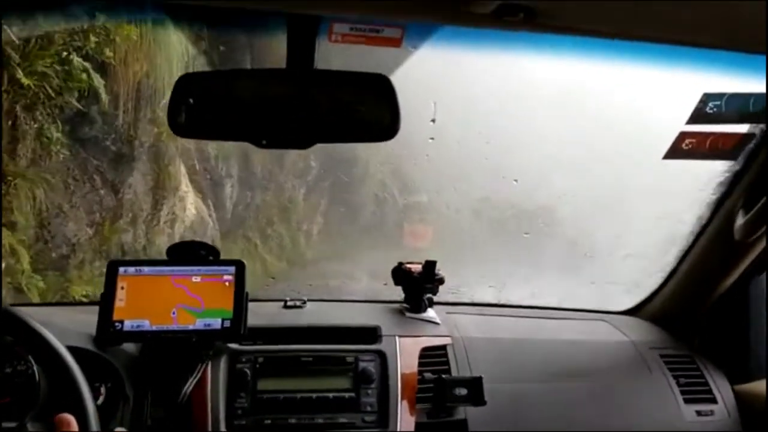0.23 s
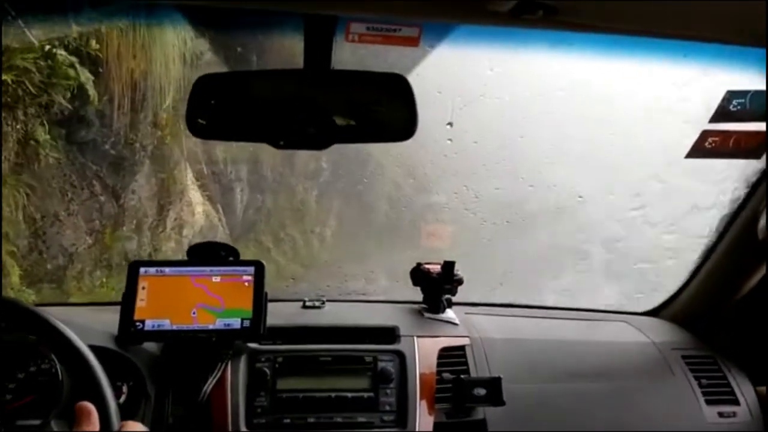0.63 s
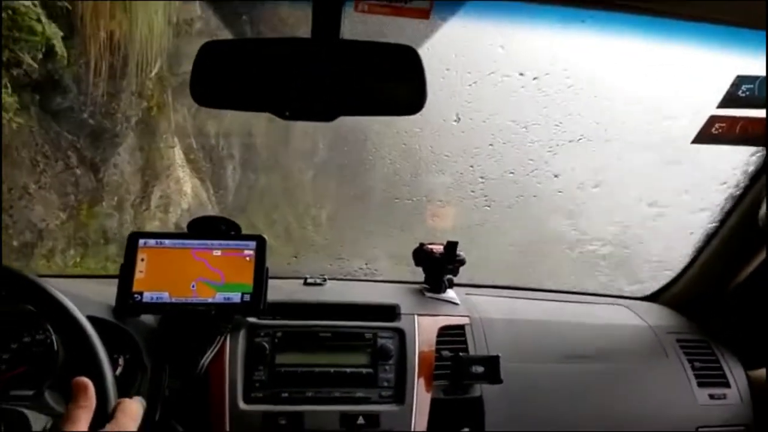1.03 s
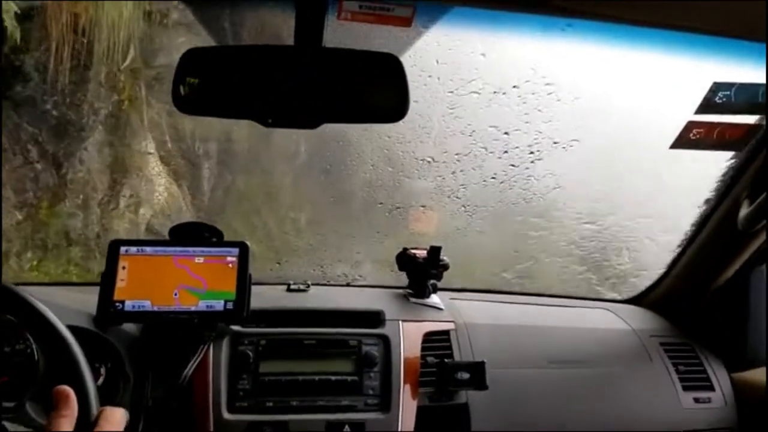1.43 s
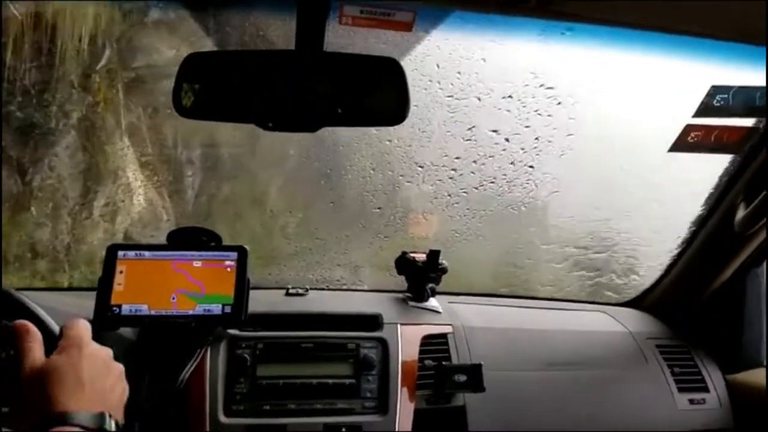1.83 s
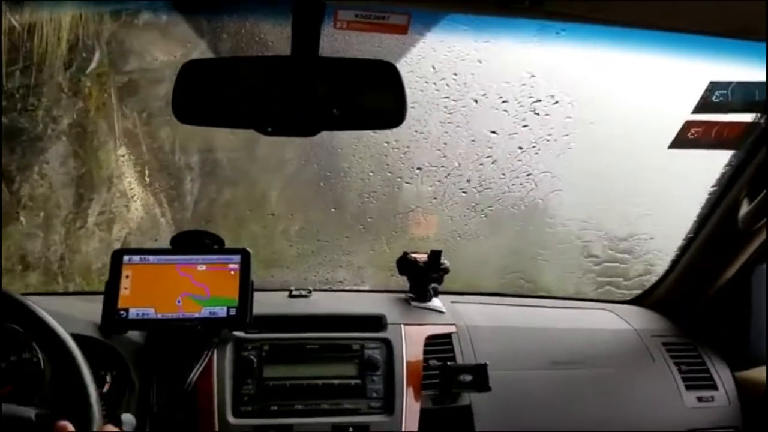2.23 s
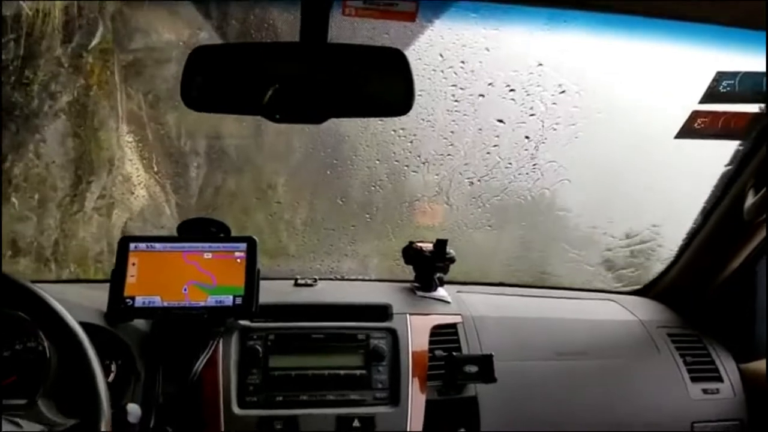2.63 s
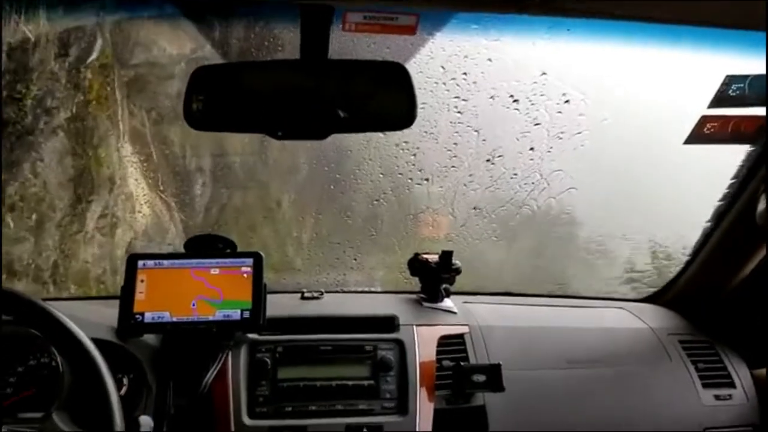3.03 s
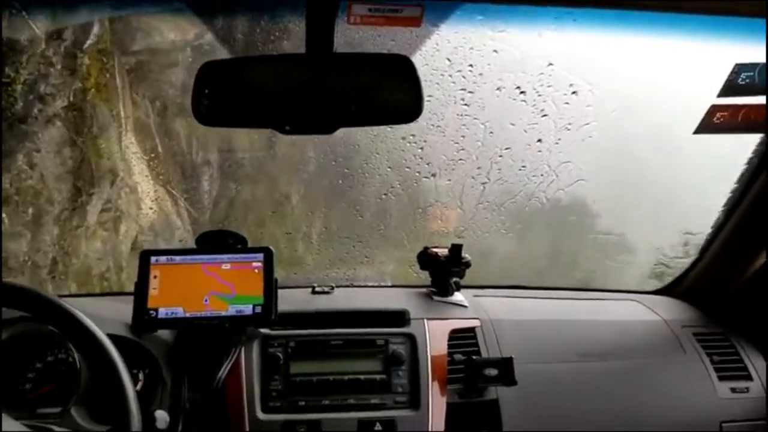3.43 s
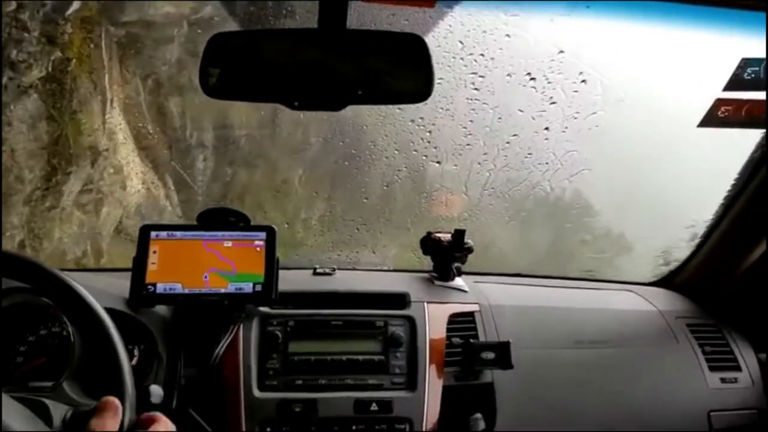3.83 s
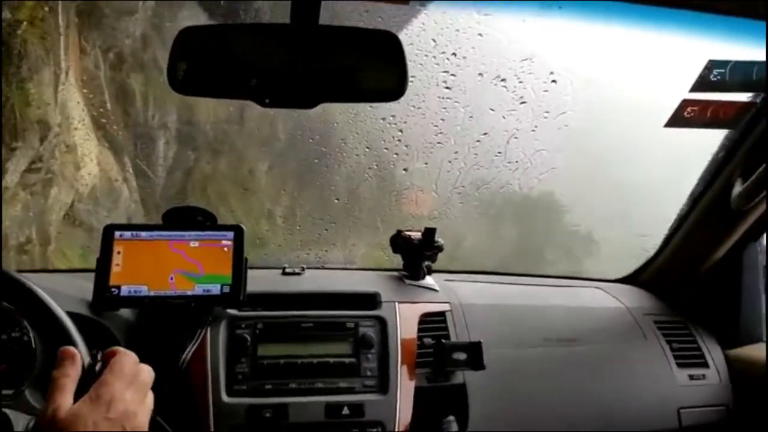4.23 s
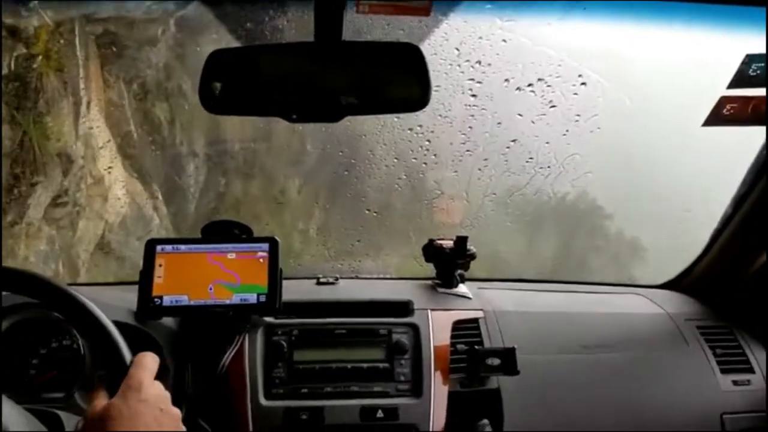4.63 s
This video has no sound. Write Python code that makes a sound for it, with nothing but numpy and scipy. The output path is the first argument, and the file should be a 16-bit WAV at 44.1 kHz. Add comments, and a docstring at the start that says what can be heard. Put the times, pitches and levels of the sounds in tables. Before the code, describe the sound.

A dense, loud torrent hits a car from outside: bright crackling drops on glass first, over a boomy cabin, then hollow drumming on lined sheet steel with heavy knocks and short sags. The rear roof rings higher before the water runs out. Quiet engine and road rumble remains, with dry ticks and a very faint high squeak, recorded inside.

```python
"""A roadside waterfall lands on a slowly rolling car, heard from inside the cabin.
The stream splatters on the windshield, then drums back along the roof in gouts and brief sags, and runs out:
random and listed impacts excite panels, modelled as coloured, decaying noise responses.
The covered pane makes the cabin air boom, spray hisses behind and dribbles end it as filtered drop trains.
Engine and road rumble as filtered noise; decaying sines and cracks click; two gliding sines squeak faintly."""
import sys
import numpy as np
from scipy import signal
from scipy.fft import rfft, irfft
from scipy.io import wavfile
from scipy.ndimage import uniform_filter1d

SR = 44100
rng = np.random.default_rng(int(sys.argv[2]) if len(sys.argv) > 2 else 0)


def wav_record(signal):
    """Record a signal, one row per channel, as 16-bit PCM in the file named by sys.argv[1]."""
    frames = np.transpose(np.atleast_2d(signal))
    bounded = np.clip(frames, -1, 1)
    # unit amplitude maps onto the largest positive 16-bit level
    quanta = np.round(bounded * 32767).astype(np.int16)
    wavfile.write(sys.argv[1], SR, quanta)


N = 215368
TIME = np.arange(N) / SR
SIZE = 4096  # samples in a panel response
LEAD = 128  # samples of room for the front of a response
HZ = np.fft.rfftfreq(SIZE, 1 / SR)
SPOTS = 6  # places on a panel that answer differently
FRONT, DOME, MIDDLE, CABIN, REAR = range(5)  # parts of the roof, as rows of the passage table

# Levels in all tables are relative; left_right_db is left minus right.
# water landing on the windshield: start_s [s], flow_db [dB]
GLASS_STREAM = [(0, -3), (0.15, -1.5), (0.4, 1), (0.8, -4), (1.2, -8.5), (1.38, -20), (1.9, -24),
                (3.4, -40), (4.1, -51)]
# water landing on the roof: start_s [s], flow_db [dB]
ROOF_STREAM = [(0, 0), (1.1, 2), (1.5, 1), (1.8, 1.5), (2.55, 1), (2.95, -1.5), (3.39, -5), (3.44, -10),
               (3.65, -14), (3.75, -29), (3.92, -18), (4.15, -28)]


def amp(db):
    """Logarithmic level: decibels to amplitude gain."""
    return np.exp(np.asarray(db) * (np.log(10) / 20))


def evened(x):
    """Normalisation by mean power: scales to an rms of one."""
    return x / np.sqrt(np.mean(x ** 2) + 1e-20)


def level(curve):
    """Amplitude envelope: a dB curve, linear between its points, as a gain for every sample."""
    return amp(np.interp(TIME, *np.transpose(curve)))


def read(points, axis=1):
    """Logarithmic frequency scale: interpolates one column of a spectrum at every frequency."""
    rows = np.array(points)
    return np.interp(np.log(HZ + 1), np.log(rows[:, 0] + 1), rows[:, axis])


def colour(points):
    """Minimum phase: causal left and right filters that together keep the power of white noise."""
    lean = amp(read(points, axis=2))
    sides = np.array([lean, np.ones_like(lean)]) / np.hypot(lean, 1)
    gain = evened(amp(read(points)) * sides)
    # folding the cepstrum onto positive time makes the filter causal
    cepstrum = irfft(np.log(gain + 1e-6), SIZE)
    cepstrum[:, 1:SIZE // 2] *= 2
    cepstrum[:, SIZE // 2 + 1:] = 0
    return np.exp(rfft(cepstrum))


def heard(pair, points):
    """Interaural coherence: mixes two spectra into a stereo response, most alike at long wavelengths."""
    # likeness of the two sides: frequency_hz [Hz], correlation [-1 to 1]
    likeness = [(60, .992), (130, .975), (290, .88), (640, .7), (1000, .1), (1350, -.3), (2400, -.05),
                (6000, 0)]
    same = np.array([np.ones_like(HZ), np.clip(read(likeness), -1, 1)])
    mixed = same * pair[..., :1, :] + np.sqrt(1 - same ** 2) * pair[..., 1:, :]
    return np.roll(irfft(mixed * colour(points), SIZE), LEAD, axis=-1)


def sounded(impacts, answers):
    """Linear superposition: convolves each impact train with its stereo response, block by block."""
    count = N // SIZE + 1
    padded = np.pad(impacts, ((0, 0), (0, count * SIZE - N)))
    blocks = padded.reshape(len(impacts), count, SIZE)
    block_spectra = rfft(blocks.astype(np.float32), 2 * SIZE)
    answer_spectra = rfft(answers.astype(np.float32), 2 * SIZE)
    summed = np.einsum("sbf,scf->cbf", block_spectra, answer_spectra)
    heads, tails = np.split(irfft(summed), 2, axis=2)
    heads[:, 1:] += tails[:, :-1]
    return heads.reshape(2, -1)[:, LEAD:LEAD + N]


def drops(per_s, spread_db, clump_db, clump_hz):
    """Clustered random impacts: drops of uneven size, where each clump lands on one spot of a panel."""
    starts = rng.random(N) < 4 * clump_hz / SR
    # every clump start decays exponentially; the slow mean is taken out
    clumps = signal.lfilter([1.], [1., -np.exp(-2 * np.pi * abs(clump_hz) / SR)], 1. * starts)
    clumps = evened(clumps - uniform_filter1d(clumps, size=3600))
    chance, weight = rng.random(N), rng.exponential(1, N)
    sign, spot = rng.choice([-1., 1.], N), rng.integers(0, SPOTS, N)
    at = np.flatnonzero(chance < per_s / SR)
    clump_start = np.maximum.accumulate(np.arange(N) * starts)[at]
    size_db = spread_db * np.minimum(weight[at], 3) + clump_db * np.minimum(clumps[at], 2)
    sizes = sign[at] * amp(size_db)
    hits = np.zeros((SPOTS, N), np.float32)
    hits[spot[clump_start], at] = sizes * np.sqrt(N / np.sum(sizes ** 2))
    return hits


def knocks(times, dbs):
    """Impulsive excitation: single impacts that land on one spot of the panel after another."""
    hits = np.zeros((SPOTS, N), np.float32)
    hits[np.arange(len(times)) % SPOTS, np.round(np.array(times) * SR).astype(int)] = amp(dbs)
    return hits


def gouts(times, dbs, lengths):
    """Transient force: lumps of water that burst with a fast rise and spread out with an exponential fall."""
    force = np.zeros(N)
    for s, db, length in np.broadcast(times, dbs, lengths):
        start = max(round(s * SR), 0)
        age = TIME[:N - start][:SR // 4] / length
        force[start:start + len(age)] += amp(db) * (1 - np.exp(-20 * age)) * np.exp(-age)
    return force


def flow(curve):
    """Modulated force: the stream on a panel, whose level dips at the listed breaks."""
    # breaks in the stream: center_s [s], depth_db [dB, negative for a slight swell]
    breaks = [(0.005, 2), (0.122, 0), (0.275, 4), (0.608, 7), (0.768, 2.5), (0.963, 2.5), (1.41, 3),
              (1.715, -0.5), (1.967, 5), (2.225, 3), (2.697, 9), (3.225, 5.5)]
    lull_s = 0.013  # Gaussian width
    depth_db = sum(db * np.exp(-((TIME - s) / lull_s) ** 2) for s, db in breaks)
    return level(curve) * amp(-depth_db)


def passing(part):
    """Moving excitation: gain of one part of the roof as the stream nears it and leaves it."""
    # front edge (patters), dome (booms), middle (drums), stretch that pumps the cabin air, rear (rings higher):
    # loudest_s [s], level_db [dB], rise [dB/s], fall [dB/s]
    passages = [(0.45, -33, 4.5, 1.5), (1.8, -30.5, 4, 6), (1.82, -27, 1.65, 2.5), (2.42, -35.5, 23.5, 48),
                (2.9, -33.5, 14, 7)]
    s, db, rise, fall = passages[part]
    return amp(db - rise * np.maximum(s - TIME, 0) - fall * np.maximum(TIME - s, 0))


def panel(impacts, points, ring_s, direct, even=1, patchy_db=0):
    """Impulse response: each spot gives a sharp knock, then decaying panel and cabin echoes in its own colour."""
    spot_width_hz = 384  # spacing of the random colour differences between spots
    spots = len(impacts)
    # ring_s is the time to fall by 60 dB
    answer = rng.standard_normal((spots, 2, SIZE)) * amp(-60 * TIME[:SIZE] / ring_s)
    answer /= np.linalg.norm(answer, axis=2, keepdims=True)
    knock = np.arange(SIZE) == rng.integers(0, 20, (spots, 2, 1))
    answer += direct * knock * rng.choice([-1, 1], (spots, 2, 1))
    modes = rfft(answer)
    power = (abs(modes) ** 2).mean(0)
    # with even = 0 the narrow resonances stand out
    modes /= np.sqrt(power ** even * power.mean() ** (1 - even))
    random_rows = rng.standard_normal((spots, len(HZ)))
    uneven = [np.interp(HZ / spot_width_hz, np.arange(len(row)), row) for row in random_rows]
    tints = amp(patchy_db * np.array(uneven))
    tints /= np.sqrt((tints ** 2).mean(0))
    return sounded(impacts, heard(modes * tints[:, None], points))


def squeak(lower_ratio=0.775, lower_db=-3):
    """Frequency modulation: two thin partials rise quickly and sink more slowly, loudest at the top."""
    peak_s, rise_s, fall_s = 4.667, 0.04, 0.064
    top_hz, sag, squeak_db = 14900, 0.18, -77  # sag is the share of pitch lost away from the peak
    arch = np.exp(-((TIME - peak_s) / np.where(TIME < peak_s, rise_s, fall_s)) ** 2 / 2)
    waver = evened(uniform_filter1d(rng.standard_normal(N), size=60))
    pitch_hz = top_hz * (1 - sag * (1 - arch)) * (1 + .005 * waver)
    phase = 2 * np.pi * np.cumsum(pitch_hz) / SR
    partials = np.sin(phase) + amp(lower_db) * np.sin(lower_ratio * phase)
    return amp(squeak_db) * np.sqrt(arch) * partials


def road():
    """Broadband structure-borne noise: engine and tyres rumble through the body."""
    # rumble level: start_s [s], level_db [dB]
    rumble_curve = [(0, -50), (3.8, -55), (4.25, -47), (4.65, -40), (4.88, -44.5)]
    # rumble spectrum: frequency_hz [Hz], density_db [dB per Hz], left_right_db [dB]
    rumble_colour = [(10, -32, -2), (26.2, 2, 0), (56.6, -6, 3), (100, -1.5, 0.5), (133, -2, 2.5),
                     (176, -11, 1.5), (221, -5, 0), (348, -16, 0), (700, -23.5, 1.5), (1070, -31.5, 10),
                     (1800, -41.5, -2), (3200, -34.5, -12), (4800, -41, -9), (7000, -44, 18),
                     (9200, -65, -1), (15000, -49, 12)]
    noise = rng.standard_normal((2, N))
    return sounded(noise, heard(np.eye(2)[:, :, None], rumble_colour)) * level(rumble_curve)


def clicks(crack_db=1, echo_db=-18):
    """Damped oscillation: a sharp crack and a very short ring, with a faint scatter from the cabin."""
    # ticks in the cabin: start_s [s], level_db [dB], left_right_db [dB], ring_hz [Hz],
    # decay_s [s, time constant], crack_share [0-1]
    ticks = [(3.878, -34, -12, 3100, 0.0016, 0.5), (3.897, -27, -4.5, 1440, 0.00055, 0.2),
             (3.984, -30, -10.5, 900, 0.00093, 0.5), (4, -26, -13, 800, 0.00046, 0.55),
             (4.0153, -25, -18, 4540, .0005, 0.95), (4.0242, -30, -10, 2600, 0.001, 0.4),
             (4.026, -21, -6, 3900, 0.001, 0), (4.0259, -17, -17, 1200, 0.00046, 0.9),
             (4.0591, -31, -8, 3150, 0.0011, 0.15), (4.0596, -41, 3, 4500, 0.0009, 0.1),
             (4.06, -30, 10, 1700, 0.0008, 0.55), (4.469, -44, -12, 3200, 0.001, 0.5)]
    # crack and echo spectrum: frequency_hz [Hz], density_db [dB per Hz], left_right_db [dB]
    crack_colour = [(100, -12, -7), (500, -3, -7), (1300, 0.5, 0), (2000, -4, 6), (2600, 0.5, 3),
                    (4000, -2.5, -3), (6140, -6, 1), (8050, -29, -8), (12000, -22, -1), (15000, -20, 6)]
    cracks, rings = np.zeros((2, N)), np.zeros((2, N))
    t = TIME[:SIZE]
    for s, db, lean_db, hz, decay, sharp in ticks:
        start = round(s * SR)
        gain = amp(db + np.array([[lean_db], [-lean_db]]) / 2)
        sharp = np.clip(sharp, 0, 1)
        cracks[:, start:start + 1] += gain * sharp
        ring = np.sin(2 * np.pi * hz * t) * np.exp(-t / decay)
        rings[:, start:start + SIZE] += gain * (1 - sharp) * ring
    coloured = signal.oaconvolve(cracks, irfft(colour(crack_colour)), axes=1)[:, :N]
    direct_sound = rings + amp(crack_db) * coloured
    return direct_sound + amp(echo_db) * panel(direct_sound, crack_colour, ring_s=0.069, direct=0, even=0)


def spray():
    """Dense random impacts: fine drops hiss and tick on the body, with a few dribbles at the end."""
    # spray outside: start_s [s], level_db [dB]
    spray_curve = [(0, -43.5), (3.38, -43.5), (3.45, -45.5), (3.7, -50.5), (3.86, -43.5), (3.97, -54.5),
                   (4.38, -64), (4.88, -58.5)]
    # last dribbles on the body: start_s [s], level_db [dB]
    dribbles = [(4.169, -47), (4.445, -65), (4.74, -57)]
    # hiss spectrum: frequency_hz [Hz], density_db [dB per Hz], left_right_db [dB]
    hiss_colour = [(60, -30, -1), (215, 4, 1), (453, -9, 2), (965, -8, 5), (2000, -19, 0), (3200, -18.5, 4),
                   (5520, -15.5, -5), (7470, -32, 14), (9000, -33, 4), (11000, -29, 4), (15300, -39, 12)]
    dribble_s = 0.028  # decay time constant
    force = level(spray_curve) + gouts(*np.transpose(dribbles), dribble_s)
    fine = drops(per_s=4600, spread_db=1.0, clump_db=3.0, clump_hz=25.27)
    return panel(fine * force, hiss_colour, ring_s=0.041, direct=0.52, even=0, patchy_db=3.0)


def cabin_boom(boom_db=-26.0, full_flow_db=-8):
    """Cavity excitation: the water-covered pane pumps the cabin air; so, later, does one stretch of roof."""
    # cabin air spectrum: frequency_hz [Hz], density_db [dB per Hz], left_right_db [dB]
    boom_colour = [(10, -33, 0), (25, -12.5, 0), (55, -15.5, 0), (72, -15.5, 0.5), (104, -17, 0.69),
                   (120, 2, 1.5), (141, -10, 1), (171, -14.5, 0), (217, -1, 1.4), (241, -4, 2.3),
                   (283, -13, 1), (800, -54, 1)]
    # the pumping saturates as the flow nears and passes full_flow_db
    covered = np.tanh((flow(GLASS_STREAM) / amp(full_flow_db)) ** 2)
    force = amp(boom_db) * covered + flow(ROOF_STREAM) * passing(CABIN)
    pumping = drops(per_s=830, spread_db=1.3, clump_db=1.8, clump_hz=25.16)
    return panel(pumping * force, boom_colour, ring_s=0.034, direct=0.93)


def roof(core=7, core_delay_s=0.003):
    """Plate modes: massed water roars on lined steel, drops splash and knock, the stiffer rear rings higher."""
    # gouts slapping the roof: start_s [s], boom_db, thud_db, splash_db [dB], length_s [s, decay]
    roof_gouts = [(0.022, -43, -24, -35, 0.036), (0.068, -30, -17, -35, 0.0095),
                  (0.426, -25, -22, -26, 0.016), (0.576, -41, -24, -27, 0.018),
                  (0.822, -48, -18.5, -22, 0.022), (0.872, -38, -15, -20.5, 0.011),
                  (0.916, -19, -20, -29, 0.0088), (1.083, -24, -16, -40, 0.013),
                  (1.101, -19, -14, -18, 0.015), (1.175, -26, -20, -19.5, 0.022),
                  (1.23, -22, -19.5, -37, 0.015), (1.286, -35, -18, -46, 0.011),
                  (1.321, -11.5, -16, -50.5, 0.0067), (1.432, -32, -19.5, -44, 0.0064),
                  (1.499, -22, -21, -41, 0.019), (1.64, -28, -17, -51, 0.015),
                  (1.671, -32, -20.5, -32, 0.023), (1.733, -16, -17.5, -21, 0.019),
                  (1.765, -24, -30, -52, 0.013), (1.807, -13.5, -22, -36, 0.023),
                  (1.89, -47, -49, -30, 0.014), (1.935, -18, -26.5, -52, 0.0072),
                  (1.987, -27, -24, -35, 0.073), (2.067, -45, -34, -30, 0.017),
                  (2.13, -22.5, -30, -60, 0.036), (2.189, -51, -56, -26.5, 0.026),
                  (2.396, -41, -20.5, -32, 0.016), (2.514, -23.5, -19.5, -29, 0.018),
                  (2.57, -39, -22, -27.5, 0.0048), (2.969, -37, -37, -30, 0.0098),
                  (3.179, -53, -27, -33, 0.021), (3.254, -53, -46, -30, 0.012),
                  (3.366, -45, -37.5, -34.5, 0.024), (3.547, -63.5, -79, -40.5, 0.017),
                  (3.63, -54, -42, -39, 0.011), (3.895, -68, -63, -48, 0.011)]
    # single heavy drops knocking on the roof: start_s [s], level_db [dB]
    roof_drops = [(0.0268, -11), (0.0713, -4), (0.914, -6), (1.087, -6), (1.117, -4), (1.283, -9),
                  (1.433, -8), (1.642, -10), (1.678, -9), (1.734, -5), (1.7415, -10), (1.942, -11),
                  (2.012, -11), (2.069, -8), (2.261, -7), (2.4, -12), (2.4765, -21), (2.573, -7),
                  (2.972, -17), (3.01, -18), (3.45, -25), (3.637, -27), (3.897, -30)]
    # spectra of the rear, the booming low modes, the drumming middle, the pattering front edge
    # and the steel under one heavy drop: frequency_hz [Hz], density_db [dB per Hz], left_right_db [dB]
    rear_colour = [(305, -42, -2), (670, -18.5, 6), (747, 8.5, 1.5), (810, -1, -6), (860, 3, 2),
                   (956, -11, 3), (1020, -11, 3), (1120, -14.5, 0), (1200, -23, 11), (1940, -14, -6),
                   (3200, -27.5, 4), (4850, -17.5, 1.5), (6600, -50, -12), (15000, -51, -2)]
    dome_colour = [(39.7, -40.5, -4), (121, -17.5, 4), (161, -18, 2), (223.5, -1, 1.5), (253.5, 0.5, -1.5),
                   (330, -6, 4), (463, -17.5, 2.5), (1190, -70, 4)]
    drum_colour = [(60, -33, 3), (170, -23, 2), (254, -9.5, 1.5), (313, -1, 2), (485, -0.5, -1),
                   (582, -5.5, 1.5), (636, -6.5, 1.5), (685, -8.5, 9.5), (756, -5.5, 5), (825, -12.5, -5.5),
                   (914, -13, 4), (1400, -26.5, -1.5), (3970, -94.5, 1)]
    patter_colour = [(60, -30, 0), (203, -14, 0), (614, -8.5, 1), (1150, -2, -0.5), (1330, -3, 1.5),
                     (1650, -5.5, -0.5), (1950, -3.5, -1.5), (2300, -7.5, 0), (3100, -8.5, 0.5),
                     (5800, -19.5, 0.5), (7330, -39, 2), (8300, -49, -17), (10730, -29, 1.5),
                     (12500, -48, -12), (15500, -37, 11)]
    knock_colour = [(60, -26, 0), (250, 12, 0), (520, -1, 1), (800, -3, 2), (1200, -2, 1), (1900, -16, 2),
                    (3200, -14, 4), (5500, -20, -2), (8000, -42, 0)]
    s, boom, thud, splash, length = np.transpose(roof_gouts)
    water = flow(ROOF_STREAM)
    mass = drops(per_s=3000, spread_db=2.4, clump_db=0.9, clump_hz=40) * water
    stream = drops(per_s=1500, spread_db=3.5, clump_db=1.5, clump_hz=45) * water
    burst = drops(per_s=3000, spread_db=0.5, clump_db=-0.7, clump_hz=88.4)
    burst = burst + core * knocks(s + core_delay_s, 0)  # the solid core lands just after the first spray
    booming = mass * passing(DOME) + burst * gouts(s, boom, length)
    drumming = mass * passing(MIDDLE) + burst * gouts(s, thud, length)
    pattering = stream * passing(FRONT) + burst * gouts(s, splash, length)
    return (panel(mass * passing(REAR), rear_colour, ring_s=0.02, direct=0.63)
            + panel(booming, dome_colour, ring_s=0.017, direct=1.4)
            + panel(drumming, drum_colour, ring_s=0.072, direct=0.75)
            + panel(pattering, patter_colour, ring_s=0.039, direct=0.45, even=0, patchy_db=4)
            + panel(knocks(*np.transpose(roof_drops)), knock_colour, ring_s=0.027, direct=2.3, even=0))


def windshield(splatter_db=-26, fizz_db=-49, fizz_growth=0.47, slap_db=-1.5):
    """Radiation efficiency: glass is loudest near 3 kHz; mist fizz grows more slowly than the flow."""
    # gouts slapping the windshield: start_s [s], slap_db [dB, before the overall slap_db], fizz_db [dB]
    glass_gouts = [(0.044, -23.5, -60), (0.0647, -21.5, -56.5), (0.101, -24, -46), (0.142, -13, -36),
                   (0.172, -22, -55), (0.236, -18.5, -57), (0.318, -16.5, -41), (0.349, -15, -39),
                   (0.37, -18.5, -50), (0.431, -16, -54), (0.489, -24, -67), (0.574, -22.5, -54),
                   (0.627, -17, -37), (0.83, -20, -45), (1.047, -55, -38), (1.099, -21.5, -37),
                   (1.174, -26, -38), (1.229, -23.5, -46), (1.734, -35, -50)]
    # single heavy drops cracking on the windshield: start_s [s], level_db [dB]
    glass_drops = [(0.0283, -6), (0.068, -12), (0.0718, 3), (0.106, -8), (0.113, -8), (0.1438, -6),
                   (0.149, -6), (0.177, -11), (0.2353, -6), (0.2444, -6), (0.293, -2), (0.3209, -14),
                   (0.3348, -3), (0.3508, -7), (0.372, -10), (0.3885, -8), (0.4234, -11), (0.4348, -7),
                   (0.4413, -9), (0.4735, -11), (0.5136, -1), (0.552, -9), (0.5824, 3), (0.63, -5),
                   (0.6372, -7), (0.8383, -10), (0.9248, -6), (1.104, -16), (1.1107, -7), (1.185, -11),
                   (1.2323, -11)]
    # spectra of the glass and of the mist on it:
    # frequency_hz [Hz], density_db [dB per Hz], left_right_db [dB]
    glass_colour = [(60, -18, -2), (350, -11.5, 0), (544, -2.5, 5), (690, -7, 6), (930, -1, 5),
                    (1050, -11.5, 5), (1220, -2.5, 1.5), (1700, -7.5, 0.5), (2200, -6.5, -2),
                    (2600, -3.5, -9), (2910, 0.5, -9), (3120, 6.5, -18), (3310, 5, -13), (3560, 2, -13.5),
                    (4200, -0.5, -9.5), (5050, -2, -8), (5430, -4.5, -12), (5970, -12.5, 3),
                    (7240, -19, 22), (8260, -31, 1), (10400, -35, 19), (15000, -27, 25)]
    fizz_colour = [(3000, -45, 8), (8500, -10.5, 7), (10600, -6.5, 7), (14900, -3.5, 22)]
    slap_s = 0.012  # decay time constant
    s, slap, mist = np.transpose(glass_gouts)
    water = flow(GLASS_STREAM)
    stream = drops(per_s=1600, spread_db=3.6, clump_db=0.9, clump_hz=50.4)
    burst = drops(per_s=2000, spread_db=1.0, clump_db=-2, clump_hz=91)
    splatter = stream * amp(splatter_db) * water + burst * gouts(s, slap + slap_db, slap_s)
    misting = stream * amp(fizz_db) * water ** fizz_growth + burst * gouts(s, mist, slap_s)
    return (panel(splatter, glass_colour, ring_s=0.036, direct=1.42, even=0, patchy_db=1.5)
            + panel(knocks(*np.transpose(glass_drops)), glass_colour, ring_s=0.035, direct=1.9, even=0)
            + panel(misting, fizz_colour, ring_s=0.038, direct=0.77, even=0))


def scene():
    """Superposition: the sum of everything that reaches the cabin."""
    return squeak() + road() + clicks() + spray() + cabin_boom() + roof() + windshield()


def record(dry):
    """Band limitation: a linear-phase low-pass filter removes the highest treble."""
    edge_hz = 15850
    lowpass = signal.firwin(511, edge_hz, window=("kaiser", 9), fs=SR)
    return signal.oaconvolve(dry, lowpass[None], "same")


dry = scene()
out = record(dry)
wav_record(out)
```